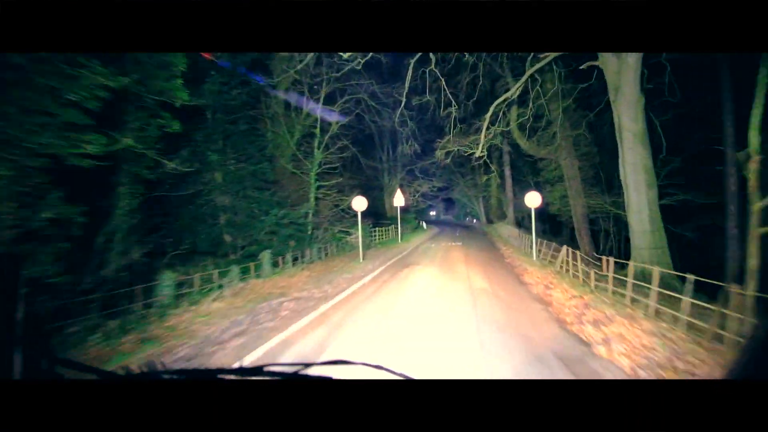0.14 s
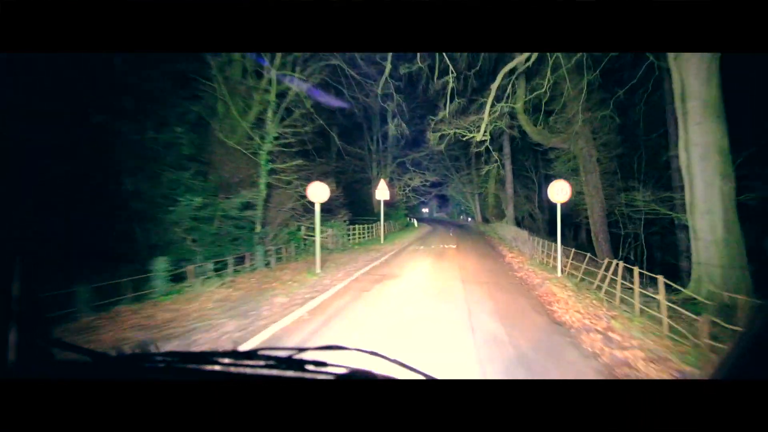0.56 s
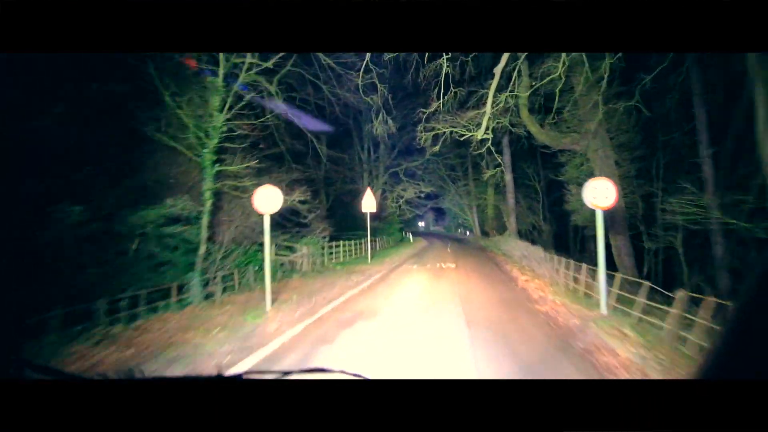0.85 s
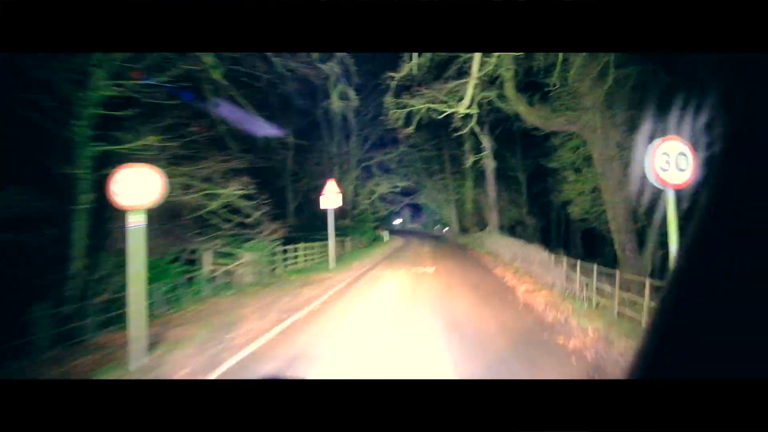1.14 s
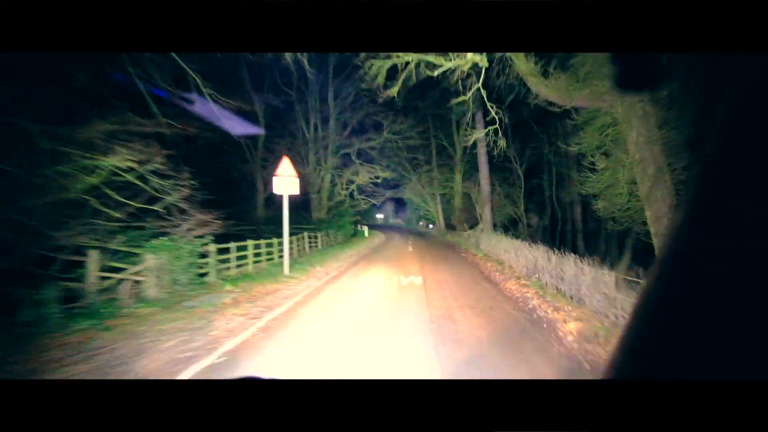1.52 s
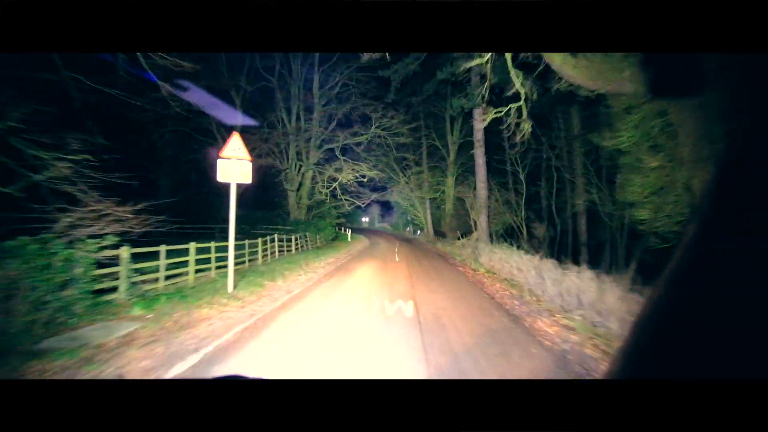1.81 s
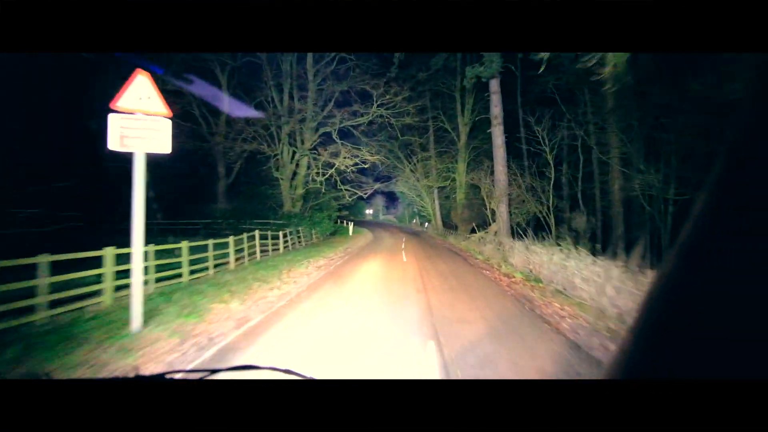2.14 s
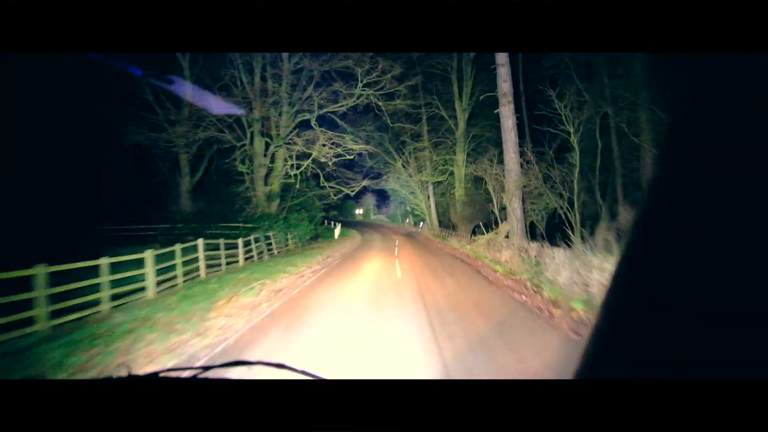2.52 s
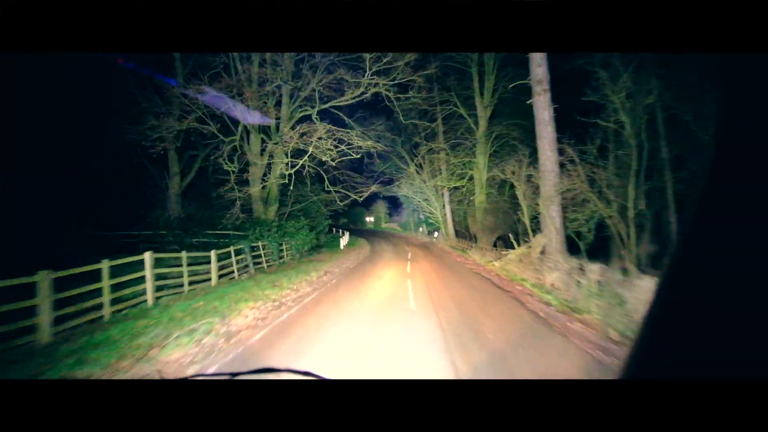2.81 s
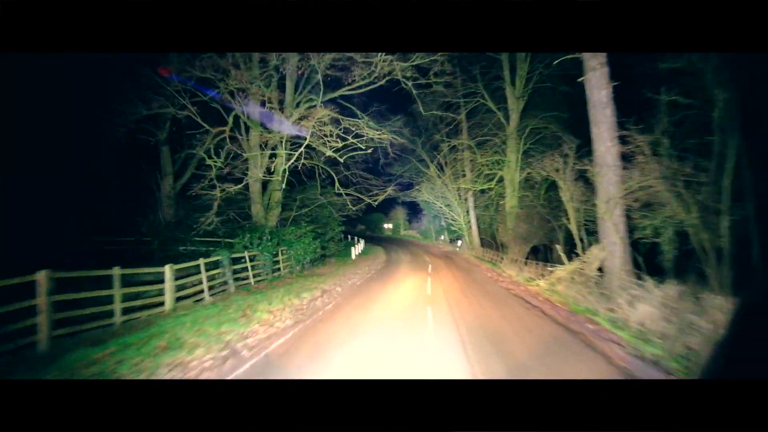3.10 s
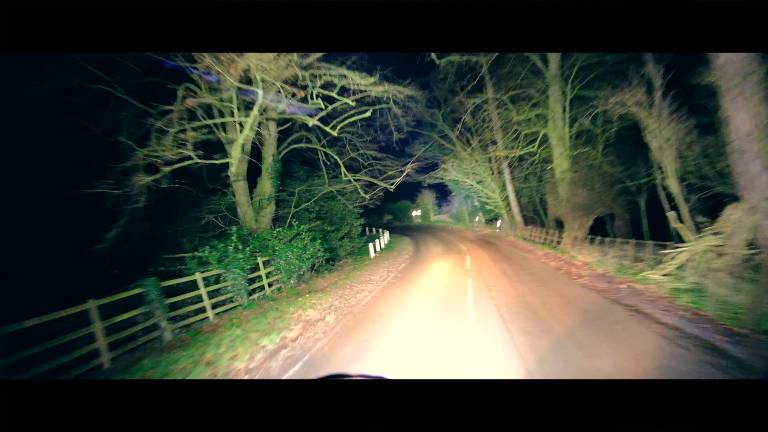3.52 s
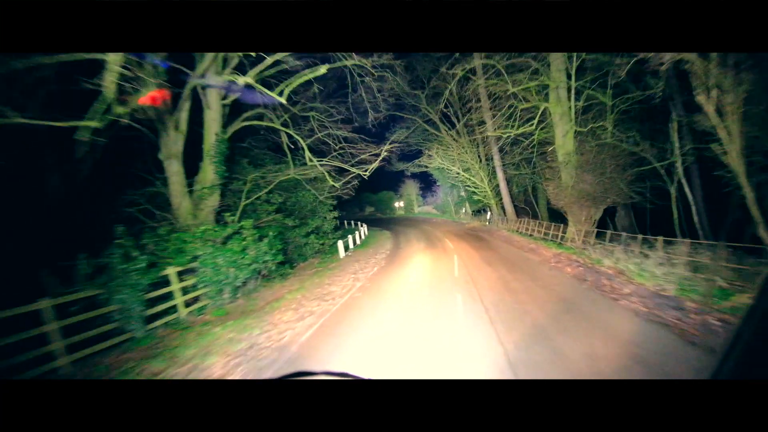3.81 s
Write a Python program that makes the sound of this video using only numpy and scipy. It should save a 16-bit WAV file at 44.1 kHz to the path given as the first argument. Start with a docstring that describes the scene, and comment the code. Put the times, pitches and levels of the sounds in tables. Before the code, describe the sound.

Steady low road roar and engine hum fill a moving van cab, the boom pulsing softly with the wheels, while loose metal ticks and dull trim knocks scatter irregularly over it; close microphone inside the cab, mono.

```python
"""Inside a van cab rolling along a country road, under broad road and wind roar and hiss (banded noise).
Tyres and body boom once per wheel turn (high multiples of the turn in phase); the engine hums, geared to them
(multiples of the firing rate). A tiny part chirps very high (struck modes), a loose metal part ticks
and rings (noise bursts and struck modes), and trim knocks dully (softened touches on struck modes)."""
import sys
import numpy as np
from scipy import signal
from scipy.io import wavfile
from scipy.ndimage import uniform_filter1d

SR = 44100
rng = np.random.default_rng(int(sys.argv[2]) if len(sys.argv) > 2 else 0)


def volts_from_db(level):
    """Convert decibel levels to linear amplitude ratios."""
    exponent = np.asarray(level, float) / 20
    return 10 ** exponent


def wav_record(signal):
    """Record a signal, one row per channel, as 16-bit PCM in the file named by sys.argv[1]."""
    frames = np.transpose(np.atleast_2d(signal))
    bounded = np.clip(frames, -1, 1)
    # unit amplitude maps onto the largest positive 16-bit level
    quanta = np.round(bounded * 32767).astype(np.int16)
    wavfile.write(sys.argv[1], SR, quanta)


N = 174195  # samples


def rms_one(x):
    """Normalization: scale a signal to unit root-mean-square."""
    return x / np.sqrt(np.mean(x ** 2) + 1e-20)


def in_time(rows):
    """Linear interpolation: each column of a table becomes one value per sample."""
    t, *columns = np.transpose(rows)
    return [np.interp(np.arange(N) / SR, t, column) for column in columns]


def drift(rate_hz):
    """Low-pass filtered noise: two equal poles leave a slow random course of zero mean and spread 1."""
    step = 40  # samples between computed points
    r = np.exp(-2 * np.pi * rate_hz * step / SR)
    white = rng.standard_normal(N // step + 4002)
    slow = signal.lfilter([1], [1, -2 * r, r * r], white)[4000:]  # settled part
    return np.interp(np.arange(N) / step, np.arange(len(slow)), rms_one(slow - slow.mean()))


def impulses(t, gains):
    """Impulse excitation: one weighted sample per blow."""
    out = np.full(N + SR, 1e-18)
    np.add.at(out, (np.asarray(t) * SR).astype(int), gains)
    return out[:N]


def decay(x, t60):
    """Exponential decay: each impulse becomes an envelope falling 60 dB in t60 seconds."""
    return signal.lfilter([1], [1, -volts_from_db(-60 / (t60 * SR))], x)


def resonate(x, hz, width_hz):
    """Damped resonance: a two-pole band-pass of gain 1 at its peak."""
    r = np.exp(-np.pi * width_hz / SR)
    poles = [1, -2 * r * np.cos(2 * np.pi * hz / SR), r * r]
    return signal.lfilter([(1 - r * r) / 2, 0, (r * r - 1) / 2], poles, x)


def struck(t, db, modes, spread_db):
    """Modal superposition: every blow excites every decaying mode with a strength and sign of its own."""
    out = 0
    chance = rng.standard_normal((len(t), len(modes), 2))
    for k, (hz, mode_db, t60) in enumerate(modes):
        strength = volts_from_db(db + mode_db + spread_db * chance[:, k, 0])
        blows = impulses(t, strength * np.sign(chance[:, k, 1]))
        r = volts_from_db(-60 / (t60 * SR))
        w = 2 * np.pi * hz / SR
        out = out + signal.lfilter([0, np.sin(w)], [1, -2 * r * np.cos(w), r * r], blows)
    return out


def banded_noise(spectrum, patchy_db):
    """Spectral shaping: sixth-octave noise bands flicker partly together, partly alone; the sum has rms 1."""
    hzs, dbs = np.transpose(spectrum)
    out = 0
    together = drift(8.0)
    edges = 14 * 2 ** np.arange(0, 10.4, 1 / 6)  # Hz
    white = rng.standard_normal((2, N + SR // 2))  # neighbouring bands use different noise
    for k, (low, high) in enumerate(zip(edges, edges[1:])):
        if hzs[0] * .8 < low < hzs[-1]:
            band_pass = signal.butter(2, [low, high], "band", fs=SR, output="sos")
            band = signal.sosfilt(band_pass, white[k % 2])[-N:]
            db = np.interp(np.log(low * high) / 2, np.log(hzs), dbs)
            flicker_db = patchy_db * (2.06 * together + drift(13.0))
            out = out + band * volts_from_db(db + flicker_db)
    return rms_one(out)


# course of road and wind noise: t/s, relative roar level/dB, relative hiss level/dB
ROAD_LEVELS = [(0, -22, -37), (1.6, -19, -36.5), (2.7, -21, -39), (3.95, -20.5, -36.5)]
# spectrum of the low roar: f/Hz, relative band level/dB
ROAR_SPECTRUM = [(14, -9), (70, -10.5), (98, -2.5), (113, -11), (175, -12.5), (295, -16.5), (420, -21.5),
                 (820, -30), (930, -39)]


def road_roar():
    """Broadband noise: the low part of the road and wind roar, with a level that changes slowly."""
    level_db = in_time(ROAD_LEVELS)[0]
    return volts_from_db(level_db + 5) * banded_noise(ROAR_SPECTRUM, patchy_db=.5)


# spectrum of the hiss: f/Hz, relative band level/dB
HISS_SPECTRUM = [(700, 3), (2610, -11.5), (4610, -18.5), (9000, -27), (11000, -36.5), (16200, -40)]


def road_hiss():
    """Broadband noise: the high part of the road and wind roar follows a level course of its own."""
    level_db = in_time(ROAD_LEVELS)[1]
    return volts_from_db(level_db + 4) * banded_noise(HISS_SPECTRUM, patchy_db=.5)


# wheel rotation: t/s, rotation f/Hz (turns per second)
WHEEL_SPEED = [(0, 4.88), (1.1, 4.865), (2.2, 4.945), (2.7, 4.975), (3.2, 4.95), (3.95, 4.85)]


def turning():
    """Phase integration: the wheel angle is the summed speed, near zero at the first bump."""
    first_bump_s = .165
    speed, = in_time(WHEEL_SPEED)
    return 2 * np.pi * (np.cumsum(speed) / SR - first_bump_s * speed[0])


# slow swells: t/s, wheel boom level change/dB, engine hum level change/dB
SWELLS = [(0, 2.5, -2.5), (1.2, -4, -0.5), (2.5, 2, -2), (3.95, -0.5, 2)]
# multiples of the wheel turn lifted by the cab: multiple -> rms level before the swell/dB
WHEEL_MULTIPLES = {15: -28, 17: -25, 18: -21, 20: -21}


def wheels():
    """Harmonic superposition: wavering multiples of the turn meet once per turn in a soft bump."""
    turn = turning()
    boom = 0
    for k, db in WHEEL_MULTIPLES.items():
        level = np.sqrt(2) * volts_from_db(db + 0.7 * drift(0.33))
        boom = boom + level * np.cos(k * turn + 0.2 * drift(1.0))
    return volts_from_db(in_time(SWELLS)[0]) * boom


# engine hum: multiple of the firing rate -> rms level before the swell/dB
FIRING_MULTIPLES = {2: -24.5, 3: -28}


def engine():
    """Harmonic superposition: low multiples of a firing rate locked to the wheels, with wavering phase."""
    firings_per_turn = 12.58
    phase = firings_per_turn * turning()
    hum = 0
    for k, db in FIRING_MULTIPLES.items():
        level = np.sqrt(2) * volts_from_db(db + 2.84 * drift(6.0))
        hum = hum + level * np.sin(k * phase + 0.75 * drift(4.0))
    return volts_from_db(in_time(SWELLS)[1]) * hum


# high chirps: t/s, relative level/dB
CHIRP_TIMES = [(0.0508, -49), (0.9018, -49), (1.268, -41), (1.512, -46), (1.7584, -45), (1.98, -45),
               (2.424, -44), (2.6843, -51), (2.9248, -43), (3.0876, -49), (3.268, -47), (3.3303, -43),
               (3.544, -46), (3.6696, -41), (3.7524, -45), (3.909, -46)]
# modes of the tiny part: f/Hz, relative level/dB, decay time T60 t/s
TINY_PART_MODES = [(11620, 0, .022), (12000, -2, .022)]


def chirps():
    """Modal excitation: three close touches on neighbouring high modes, and the whole chirp again."""
    again_s, swell_s = 0.019, 0.0015
    t, db = np.transpose(CHIRP_TIMES)
    t, db = np.r_[t, t + again_s], np.r_[db, db]
    touches = np.arange(3)[:, None] * rng.uniform(0.21, 0.88, (len(t), 3)).T
    touch_t = t + swell_s * touches
    touch_db = db + 0 * touches
    rings = struck(touch_t.ravel(), touch_db.ravel(), TINY_PART_MODES, spread_db=3.5)
    return resonate(resonate(rings, 11800, 1000), 11800, 1000)


# metal ticks: t/s, relative crack level/dB, relative ring level/dB
TICK_TIMES = [(0.0765, -17, -36), (0.118, -26, -43), (0.2315, -26.5, -41), (0.5678, -12.5, -30),
              (0.664, -31, -43.5), (0.824, -19.5, -29.5), (0.857, -39, -38), (0.8757, -23, -50),
              (0.931, -29.5, -45), (1.037, -26.5, -51), (1.062, -43, -41), (1.088, -29.5, -50),
              (1.1455, -22.5, -58), (1.199, -27, -44), (1.3017, -22, -42), (1.3438, -19, -40.5),
              (1.498, -29, -49), (1.5882, -25.5, -46), (1.623, -33, -35.5), (1.6506, -16, -34),
              (1.6817, -39, -43), (1.694, -17, -32.5), (1.732, -29, -53), (1.7706, -27, -49),
              (1.84, -16, -26), (1.8939, -12.5, -30), (1.9057, -51, -30.5), (1.9954, -40, -42),
              (2.047, -24, -34.5), (2.8414, -29.5, -45), (2.9475, -30, -45), (3.052, -20, -29.5),
              (3.43, -32, -32), (3.4531, -20.5, -36), (3.561, -26, -31.5), (3.5862, -29, -40),
              (3.61, -27, -44), (3.6554, -21.5, -49)]
# modes of the metal part: f/Hz, relative level/dB, decay time T60 t/s
METAL_MODES = [(4840, -3, .03), (4940, 0, .05), (5845, -8, .025), (6680, -4, .025), (7030, -2, .025)]
# colour of the crack: f/Hz, bandwidth f/Hz, relative level/dB
CRACK_BANDS = [(4960, 3600, 0), (7000, 5500, -2.5), (12100, 2000, -22)]


def ticks():
    """Impact and ringing: each blow bursts, bounces once and rings the metal; knocks shake it faintly."""
    knock_shakes_db, knock_ring_db = -17.5, -20  # ring is relative to the faint crack
    bounce_s, bounce_loss_db = 0.0077, 8.5
    crack_swell_s, crack_t60_s, tail_t60_s, tail_db = .0008, .016, .065, -9

    t, crack_db, ring_db = np.transpose(TICK_TIMES)
    faint_t, faint_db = np.transpose(np.add(KNOCK_TIMES, [0, knock_shakes_db]))
    t = np.r_[t, faint_t]
    crack_db = np.r_[crack_db, faint_db]
    ring_db = np.r_[ring_db, faint_db + knock_ring_db]

    bounce_t = t + bounce_s * rng.uniform(0.3, 1.4, len(t))
    loss_db = np.r_[0 * t, 0 * t + bounce_loss_db]
    t = np.r_[t, bounce_t]

    blows = impulses(t, volts_from_db(np.r_[crack_db, crack_db] - loss_db - 5.5))
    blows = uniform_filter1d(blows, size=int(crack_swell_s * SR))
    envelope = decay(blows, crack_t60_s) + volts_from_db(tail_db) * decay(blows, tail_t60_s)
    burst = envelope * rng.standard_normal(N)
    crack = sum(volts_from_db(db) * resonate(burst, hz, width) for hz, width, db in CRACK_BANDS)
    crack_band = signal.butter(3, [4200, 13500], "band", fs=SR, output="sos")

    ring = struck(t, np.r_[ring_db, ring_db] - loss_db, METAL_MODES, spread_db=2.5)
    return signal.sosfilt(crack_band, crack) + 2 * resonate(ring, 4680, 6000)


def at_random(per_s, floor_db):
    """Random arrivals: rows (t/s, level/dB) spread evenly by chance, mostly faint."""
    chance = rng.random((200, 2))[:int(per_s * N / SR)]
    return np.c_[chance[:, 0] * N / SR, floor_db - 3 * np.log(chance[:, 1] + .05)]


# trim knocks: t/s, relative level/dB
KNOCK_TIMES = [(0.0917, -15.5), (0.1443, -12), (0.3504, -14), (0.401, -19), (0.596, -18), (0.6295, -19),
               (0.7616, -12), (0.9973, -14.5), (1.0879, -19), (1.337, -18), (1.6493, -13.5), (1.693, -15.5),
               (1.713, -21), (1.8098, -15), (1.8736, -26), (1.8954, -13), (2.0468, -14.5), (2.1104, -7),
               (2.2712, -15.5), (2.5082, -19), (2.805, -18.5), (3.051, -15), (3.331, -15.5), (3.479, -18),
               (3.534, -12.5), (3.5613, -15.5)]
# modes of the trim: f/Hz, relative level/dB, decay time T60 t/s
TRIM_MODES = [(1072.4, -12, 0.022), (1405, -6.5, 0.0092), (1723, -11.5, 0.018), (2030, -14, 0.017),
              (2510, -13, 0.015), (2870, -13.5, 0.013), (3500, -17, 0.0066)]


def knocks():
    """Modal excitation: three quick, weakening touches on the trim, low-passed; many faint ones at random."""
    slip_s, soft_hz = 0.0046, 6000
    small_knocks = at_random(per_s=30, floor_db=-28)
    t, db = np.transpose(np.r_[KNOCK_TIMES, small_knocks])
    touches = np.arange(3)[:, None]
    touch_t = t + slip_s * touches * rng.uniform(0.519, 1.5, (len(t), 3)).T
    touch_db = db - 3.74 * touches
    body = struck(touch_t.ravel(), touch_db.ravel(), TRIM_MODES, spread_db=3.5)
    return signal.sosfilt(signal.butter(2, soft_hz, fs=SR, output="sos"), body)


def scene():
    """Linear superposition: all sources in the cab add up in one channel."""
    steady = road_roar() + road_hiss() + wheels() + engine()
    rattles = chirps() + ticks() + knocks()
    return (steady + rattles)[None]


def roll_off(x):
    """The treble ends steeply here."""
    return signal.sosfilt(signal.butter(12, 16360, fs=SR, output="sos"), x)


def record(dry):
    """Saturation: a hyperbolic tangent rounds the peaks."""
    mix = 1.475 * np.tanh(dry / 1.536)
    return roll_off(mix)


dry = scene()
out = record(dry)
wav_record(out)
```